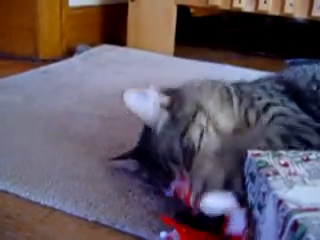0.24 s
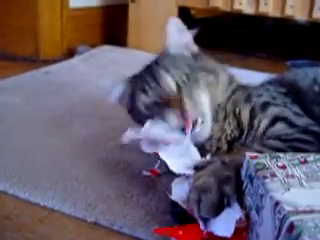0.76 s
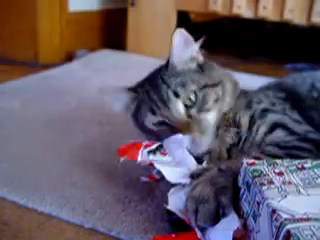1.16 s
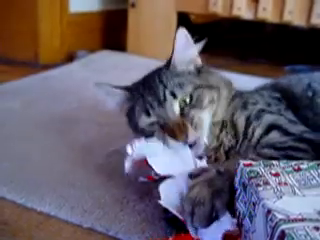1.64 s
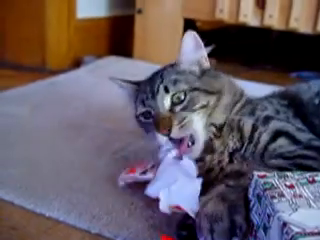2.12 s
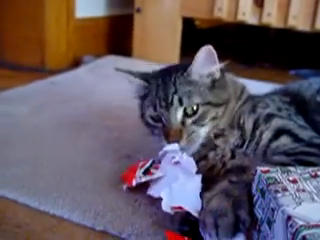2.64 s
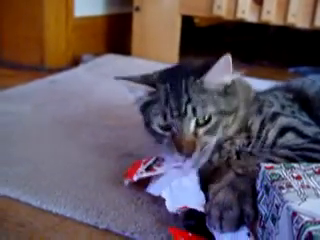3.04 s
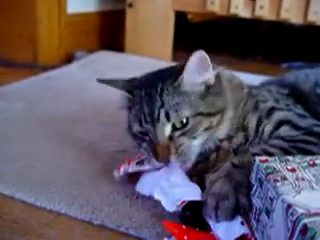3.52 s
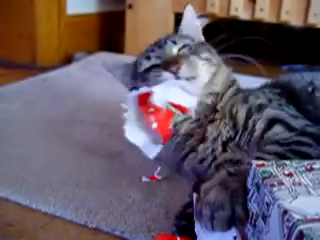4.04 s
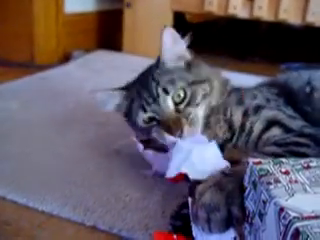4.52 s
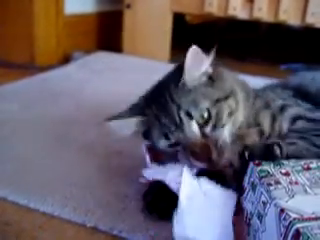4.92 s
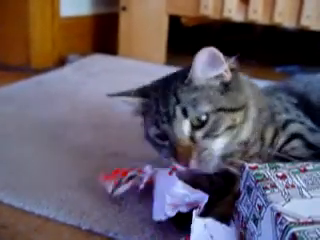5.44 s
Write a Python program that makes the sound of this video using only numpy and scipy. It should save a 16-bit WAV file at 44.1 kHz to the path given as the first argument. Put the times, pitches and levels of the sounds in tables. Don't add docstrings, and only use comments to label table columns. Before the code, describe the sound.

A cat worries thin wrapping paper close to a small camera. Faint ticks and rustles lead to a sharp burst of crease snaps and tearing at one second, a longer one after two seconds, a lull, more handling, a short hard crunch near four and a half, then lighter chewing. Low house rumble and a brief indoor echo lie behind.

```python
import sys
import numpy as np
from scipy import signal
from scipy.fft import rfft, irfft, next_fast_len
from scipy.io import wavfile
from scipy.ndimage import uniform_filter1d, minimum_filter1d, map_coordinates

SR = 44100
rng = np.random.default_rng(int(sys.argv[2]) if len(sys.argv) > 2 else 0)


def gain_from_decibels(decibels):
    exponent = np.asarray(decibels, float) / 20
    return 10 ** exponent


def int16_out(signal):
    q = np.round(np.clip(np.atleast_2d(signal).T, -1, 1) * 32767)
    wavfile.write(sys.argv[1], SR, q.astype(np.int16))


N = 250488


def unit(x):
    return x / np.sqrt(np.mean(x ** 2) + 1e-20)


def along(points, hz):
    f, v = np.transpose(points)
    return np.interp(np.log(hz + 1), np.log(f + 1), v)


def filtered(x, response):
    n = x.shape[-1]
    m = next_fast_len(n + 1024)
    return irfft(rfft(x, m) * response(np.fft.rfftfreq(m, 1 / SR)), m)[..., :n]


def wobble(rate):
    knots = rng.standard_normal(int(N * rate / SR) + 4)
    return map_coordinates(knots, [np.arange(N) * rate / SR])


# (frequency [Hz], level [dB])
AIR_COLOUR = [(12, -56), (20, -20), (53, -15.5), (67, -13.5), (87, -2.5), (230, -3), (276, -7), (350, -9),
              (561, -12), (923, -14), (7740, -28), (9800, -37), (10600, -66), (13800, -92), (22000, -120)]
# (frequency [Hz], level [dB])
APPLIANCES = [(87, -60.5), (1052, -65)]


def house():
    air = unit(filtered(rng.standard_normal(N), lambda f: gain_from_decibels(along(AIR_COLOUR, f))))
    t = np.arange(N) / SR
    tones = np.zeros(N)
    for hz, db in APPLIANCES:
        tones += gain_from_decibels(db + 1.5 * wobble(3.6)) * np.sin(2 * np.pi * hz * t + 2.24 * wobble(9))
    return gain_from_decibels(-48.5 + 0.36 * wobble(3.3)) * air + tones


# (frequency [Hz], fade time [s])
ECHO_TIME = [(400, 0.39), (2000, 0.32), (9000, 0.17)]


def room(x):
    hz, t, z = signal.stft(rng.standard_normal(SR // 2), SR, nperseg=256)
    fade = gain_from_decibels(-60 * t / along(ECHO_TIME, hz)[:, None])
    tail = signal.istft(z * fade, SR, nperseg=256)[1]
    late = np.pad(x, (350, 0))
    return signal.fftconvolve(late, tail / np.linalg.norm(tail))[:N]


# (time [s], crackle level [dB], sliding above crackle [dB])
MOVES = [(0, -85, 15), (.19, -61, -8), (.52, -56.5, -8), (.92, -54, -7), (1.33, -54, -3), (1.6, -59, 0),
         (1.92, -52, -6), (2.23, -49.5, -12), (2.72, -50, -10.5), (3.0, -71, 6.5), (3.2, -72, -1),
         (3.55, -60, -3.5), (3.72, -51, 2), (3.89, -53.5, -16.5), (4.04, -56, 6.5), (4.68, -51.5, -20),
         (4.85, -52, 0.5), (5.3, -65, -6)]


def handling():
    s, level_db, share_db = np.transpose(MOVES)
    t = np.arange(N) / SR
    return np.interp(t, s, level_db), np.interp(t, s, level_db + share_db)


def fractures(shape, spread_db):
    noise = rng.standard_normal(shape)
    return noise * gain_from_decibels(spread_db * np.minimum(rng.exponential(size=shape), 6))


def swish():
    grains = fractures(N, spread_db=2.5)
    slide = filtered(grains, lambda f: gain_from_decibels(-7 * np.log2((f + 1) / 6800) ** 2))
    return gain_from_decibels(handling()[1] - 1.0 + 1.3 * wobble(13) + 1.8 * wobble(40)) * unit(slide)


# (frequency [Hz], level [dB])
CRACKLE_COLOUR = [(280, -46), (480, -6), (806, -22), (882, -11), (1780, -16.5), (2210, -4.5), (4750, -1),
                  (8620, -3), (10100, -12.5), (10600, -39), (13800, -79), (22000, -120)]


def crackle_db(f):
    return along(CRACKLE_COLOUR, f)


# (frequency [Hz], level [dB])
BODY_COLOUR = [(250, -24.5), (420, -9.5), (600, -6.5), (1000, -6), (1900, -2.5), (2800, -11.5), (5000, -30)]


def body_gain(f):
    return gain_from_decibels(along(BODY_COLOUR, f))


# (peak time [s], crackle level [dB], rise [dB/s], fall [dB/s], sheet body [dB])
SHEET_PULLS = [(.97, -42.5, 300, 40, -0.5), (1.12, -23.5, 201.5, 168, -3), (1.2, -38, 150, 121, -22),
               (1.31, -53, 300, 400, 13), (2.28, -42, 204, 295, 7), (2.351, -38, 116, 277, 1.5),
               (2.44, -30, 902, 900, -13), (2.545, -28, 200, 136, -5.5), (2.6, -38.5, 150, 108, -2),
               (4.478, -28, 291, 420, -0.5), (4.61, -39, 220, 182, 2), (5.4, -46.5, 298, 36, 4.5),
               (5.68, -42.5, 62, 100, -6.5)]


def rustle():
    s, db, rise, fall, body_db = np.transpose(SHEET_PULLS)[:, :, None]
    t = np.arange(N) / SR - s
    pull = gain_from_decibels(db - np.where(t < 0, -rise, fall) * t)
    idle = gain_from_decibels(handling()[0])
    clumps = gain_from_decibels(3.8 * wobble(90) + 0.96 * wobble(300))
    breaks = clumps * fractures(N, spread_db=3.0)
    crackle = unit(filtered(breaks, lambda f: gain_from_decibels(crackle_db(f))))
    body = unit(filtered(breaks, body_gain))
    crisp = np.maximum(pull.max(axis=0), idle)
    flex = np.maximum((pull * gain_from_decibels(body_db)).max(axis=0), idle * gain_from_decibels(-2))
    return gain_from_decibels(-4.0) * crisp * crackle + gain_from_decibels(-8.5) * flex * body


# (time [s], level [dB], pitch [Hz])
CONTACTS = [
    (.967, -27, 937),
    (1.043, -31, 298),
    (1.176, -25, 590),
    (1.307, -33, 560),
    (2.274, -34, 338),
    (2.303, -33, 1210),
    (5.341, -46, 360),
    (5.442, -36.5, 400),
    (5.582, -36, 423),
]


def knocks():
    s, db, hz = np.transpose(CONTACTS)[:, :, None]
    t = np.arange(2048) / SR
    soft_start = 1 - np.exp(-t / 0.00072)
    ring = gain_from_decibels(db - 60 * t / 0.03) * np.sin(2 * np.pi * hz * t) * soft_start
    where = np.round((s + t) * SR).astype(int)
    return np.bincount(where.ravel(), ring.ravel(), N)[:N]


def at_peak(rows, peak_db):
    power = uniform_filter1d(rows ** 2, size=66, axis=1).max(axis=1, keepdims=True)
    return gain_from_decibels(peak_db) * rows / np.sqrt(2 * power)


def snaps(table, trim_db):
    s, db, hz, thump_db, ms = np.transpose(table)[:, :, None]
    t = (np.arange(1024) - 400) / SR
    u = t / (np.clip(ms - 1.1, .5, 12) / 1000)
    edge = 0.84 + 0.22 * ms
    steepness = np.where(u < 0, 1.23, 1.2)
    shape = np.exp(-(steepness * np.abs(u)) ** edge)
    creak = gain_from_decibels(-19 - 60 * np.abs(t) / .025)
    shape = np.maximum(shape, creak)
    breaks = shape * fractures(shape.shape, spread_db=3)
    ripple = rng.uniform(0, 2 * np.pi, (len(s), 2))

    def crease(f):
        uneven_db = 2.2 * (np.sin(f / 430 + ripple[:, :1]) + np.sin(f / 190 + ripple[:, 1:]))
        return gain_from_decibels(uneven_db - 9.9 * np.log2((f + 1) / hz) ** 2 + 0.12 * crackle_db(f))

    crack = at_peak(filtered(breaks, crease), db - 1)
    thump = at_peak(filtered(breaks, body_gain), db + thump_db - 6.5)
    both = gain_from_decibels(trim_db) * (crack + thump)
    where = np.round((s + t) * SR).astype(int)
    return np.bincount(where.ravel(), both.ravel(), N + 1024)[:N]


# (time [s], peak level [dB], colour [Hz], sheet thump [dB])
LONE_TICKS = [(0.3756, -35, 6140, -2), (0.6243, -46, 3380, -8), (0.6796, -40.5, 4150, 10),
              (.6896, -36.5, 3200, 3), (0.6974, -35.5, 3600, -2), (.845, -43, 5060, -14),
              (1.268, -28.5, 6730, -17), (1.4594, -45, 3520, 12), (1.5104, -31, 5350, -5),
              (1.9382, -38, 6260, -1), (1.991, -35, 4680, -12), (2.032, -35, 4360, -13),
              (2.0603, -39.5, 7250, 6), (2.0765, -34.5, 3470, 3), (2.1123, -33, 6100, 3),
              (2.1573, -32.5, 3800, 3), (2.1944, -42.5, 3160, 14), (2.7464, -41, 6760, -9),
              (5.361, -35.5, 4840, -9), (3.688, -27, 4700, -24), (3.8328, -33.5, 5840, 2.5),
              (4.382, -42.5, 3120, 7), (3.9019, -29.5, 6200, -3), (4.0097, -35, 4900, -3),
              (4.0934, -41, 2600, 3), (4.1746, -31, 5400, -21), (4.2237, -32.5, 4400, -12),
              (4.8196, -37, 4800, 4.5), (4.9523, -40.5, 6470, -12), (5.655, -36.5, 5700, -19)]


def ticks():
    return snaps([(*row, 1.6) for row in LONE_TICKS], trim_db=0.5)


# (start [s], end [s], peak level [dB], colour [Hz], sheet thump [dB])
TEARS = [
    (1.114, 1.161, -18.5, 3960, -1),
    (2.519, 2.538, -25.5, 6550, 0.5),
    (2.537, 2.569, -19.5, 7640, -7),
    (2.579, 2.597, -18.5, 7100, -3),
    (4.449, 4.462, -20.5, 4700, -6.5),
    (4.468, 4.477, -16, 5160, -11.5),
    (5.401, 5.437, -33.5, 6390, -4),
    (5.509, 5.545, -38, 5620, -1),
]


def tears():
    gap = .0052
    rows = []
    for start, end, db, hz, thump_db in TEARS:
        rows += [(s, db, hz, thump_db) for s in np.arange(start, end, gap)]
    chance = rng.standard_normal((len(rows), 4)) * [.25 * gap, 2.4, 450, 2.5]
    slip_ms = np.full(len(rows), 3.45)
    return snaps(np.c_[np.array(rows) + chance, slip_ms], trim_db=0.0)


# (time [s], peak level [dB], colour [Hz], sheet thump [dB], length [ms])
BITE_ONE = [(.9311, -37.5, 5200, -2, 10), (.9421, -37, 6060, -14, 9.6), (1.0062, -36, 4860, 11.5, 1.5),
            (1.161, -18.5, 5900, -6, 5.4), (.956, -33, 5430, -21, 15), (.9675, -29, 4800, 13.5, 2.3),
            (.975, -31, 5420, -21, 6.6), (.989, -32, 6920, -23, 10), (1.0204, -25.5, 3780, -21, 1.2),
            (1.042, -10.5, 5540, -35, 1.57), (1.0507, -26, 5110, -20, 3.6), (1.071, -30, 6500, -20, 3.4),
            (1.0772, -18, 6200, -22, 1.9), (1.091, -11, 6000, -13, 1.46), (1.1, -20, 3680, -9, 8.1),
            (1.1091, -12, 5250, -4, 3.4), (1.133, -15.5, 2800, -7, 4.4), (1.1475, -20, 5140, 4, 14),
            (1.1671, -18.5, 6300, 3.5, 3.5), (1.1751, -23, 6230, -21, 1.5), (1.1962, -31, 5200, -21, 13.7)]
# (time [s], peak level [dB], colour [Hz], sheet thump [dB], length [ms])
BITE_TWO = [(2.2695, -18, 6550, -19, 2.5), (2.2753, -10, 5800, -5, 4.16), (2.301, -21, 5860, -7, 1.5),
            (2.307, -19.5, 6600, -11, 1.7), (2.3161, -28, 6870, -15, 3.5), (2.3275, -29, 5770, -14, 3.3),
            (2.3375, -18.5, 5970, -20, 4.3), (2.3479, -13.5, 4670, -7, .8),
            (2.3546, -10.5, 5300, -9.5, 5.2), (2.3615, -19, 5210, -25, 1.9), (2.3708, -13, 5930, -2, .96),
            (2.3899, -19.5, 5770, -7, 3.4), (2.3962, -14.5, 5490, -7.5, .7), (2.404, -20.5, 5570, -2, 1.4),
            (2.4288, -20, 5520, -20, 2.7), (2.436, -16.5, 6340, -9, 1.4), (2.44, -17, 5210, -2.5, 1.2),
            (2.4482, -27, 5430, 2.5, 2.4), (2.4664, -19, 4900, -6, 3.1), (2.473, -22, 5520, -25, 3),
            (2.489, -25.5, 5650, -5, 5.2), (2.5143, -21.5, 5330, -2, 2.4), (2.616, -14, 5440, -5, 4.3),
            (2.631, -24, 5820, -5, 1.5)]
# (time [s], peak level [dB], colour [Hz], sheet thump [dB], length [ms])
BITE_THREE = [(4.4237, -24.5, 6100, -2, 3.2), (4.4424, -16, 4530, -8, 2.4), (4.4778, -14, 6195, -14, 3.5),
              (4.4893, -16, 5260, -20, 1.4), (4.549, -31, 4520, -14, 6), (4.5739, -8, 5230, -11, 2.34),
              (4.5787, -13, 4600, -4, 4.2), (4.586, -18, 5200, -11, 3.2), (4.592, -19, 5900, 1, 1.5),
              (4.6057, -13.5, 4850, -3.5, 5.7), (5.3383, -29, 5370, -1.1, 3.3),
              (5.345, -30.5, 5570, -6, 1.1), (5.3875, -18, 6700, -35, 1.1),
              (5.3982, -25.5, 6340, -1.5, 6.7), (5.4168, -28, 5280, 3, 1.8), (5.6735, -32, 5400, -1, 6.4),
              (5.442, -22, 5840, -1, 1.8), (5.4492, -26, 6200, -12, 1.4), (5.4746, -21.5, 6900, -6, 3.2),
              (4.418, -35, 5437, -15, 6), (5.547, -19, 5730, -27, 1.2), (5.562, -30, 4760, -8, 2.2),
              (5.5818, -16.5, 6260, -7, 1.14), (5.609, -32, 4560, 3.5, 5.7)]


def bites():
    return snaps(BITE_ONE + BITE_TWO + BITE_THREE, trim_db=-0.5)


def scene():
    paper = bites() + tears() + ticks() + knocks() + rustle() + swish()
    return (paper + gain_from_decibels(-15.5) * room(paper) + house())[None]


# (frequency [Hz], kept range [dB])
KEPT_RANGE = [(2000, 45), (3300, 26), (4300, 15), (5500, 10), (9000, 9.5)]


def starved(x):
    lead, hop, blocks = 247, 192, 6
    hz, _, z = signal.stft(np.pad(x, (lead, blocks * hop)), SR, nperseg=2 * hop)
    edges = np.r_[0:30:5, 30:96:8, 96]
    band = np.searchsorted(edges, np.arange(len(hz)), "right") - 1
    power = np.add.reduceat(abs(z) ** 2, edges, axis=0) / np.bincount(band)[:, None]
    size = np.sqrt(power)
    smooth = uniform_filter1d(size, size=5, axis=0)
    near = -minimum_filter1d(-smooth, size=5, axis=1)
    frames = np.arange(size.shape[1]) // blocks
    starts = np.arange(0, len(frames), blocks)
    loudest = np.maximum.reduceat(near, starts, axis=1)[:, frames]
    ragged_db = 3.1 * rng.standard_normal(size.shape)[:, np.arange(len(frames)) // 2]
    keep = size > loudest * gain_from_decibels(ragged_db - along(KEPT_RANGE, hz[edges])[:, None])
    return signal.istft(z * keep[band], SR, nperseg=2 * hop)[1][lead:lead + N]


def roll_off(x):
    return signal.sosfilt(signal.butter(12, 11130, fs=SR, output="sos"), x)


def record(dry):
    sound = filtered(starved(dry[0]), lambda hz: 1 / (1 + (hz / 10010) ** 120))
    return roll_off(sound[None])


dry = scene()
out = record(dry)
int16_out(out)
```